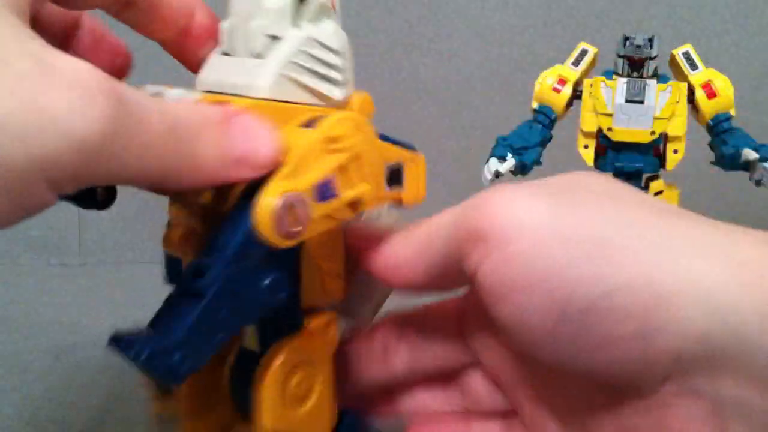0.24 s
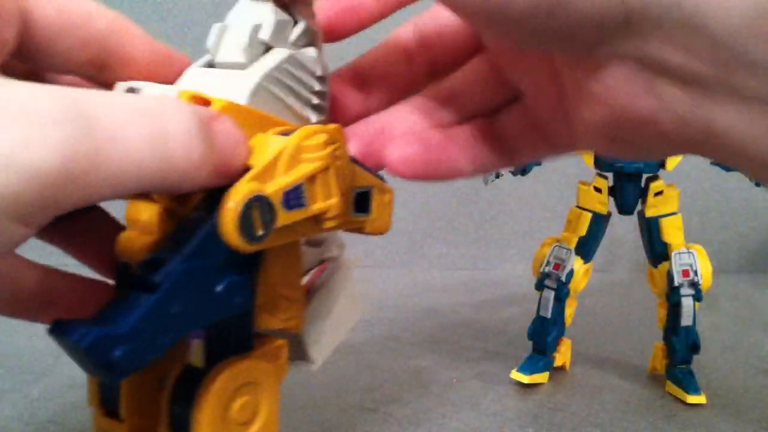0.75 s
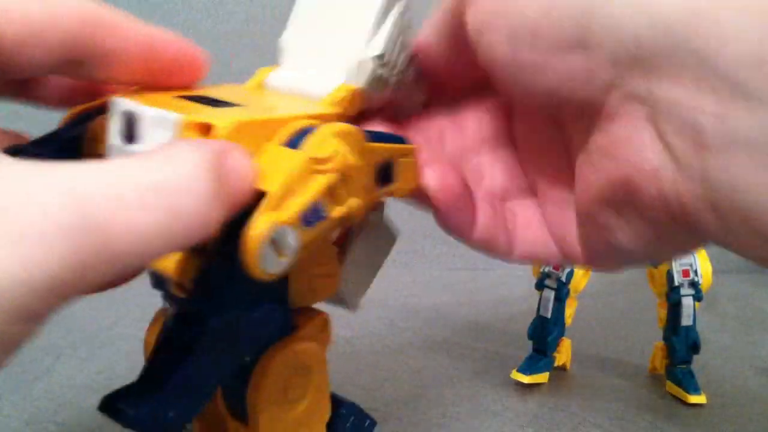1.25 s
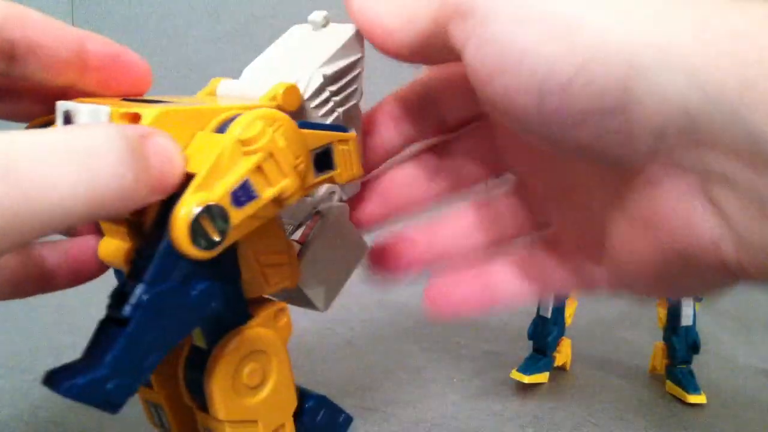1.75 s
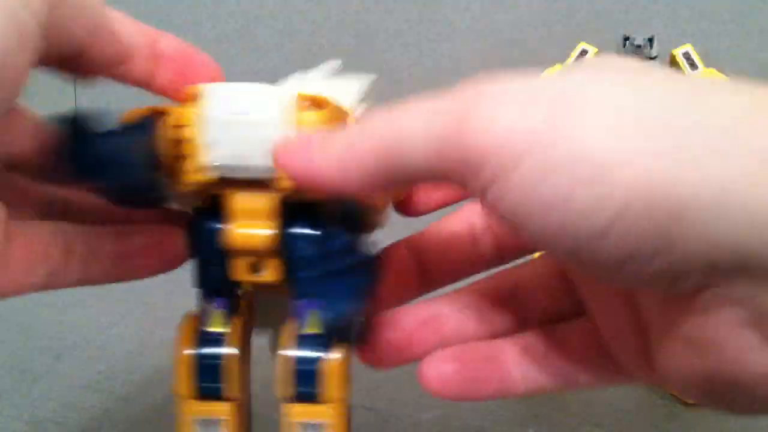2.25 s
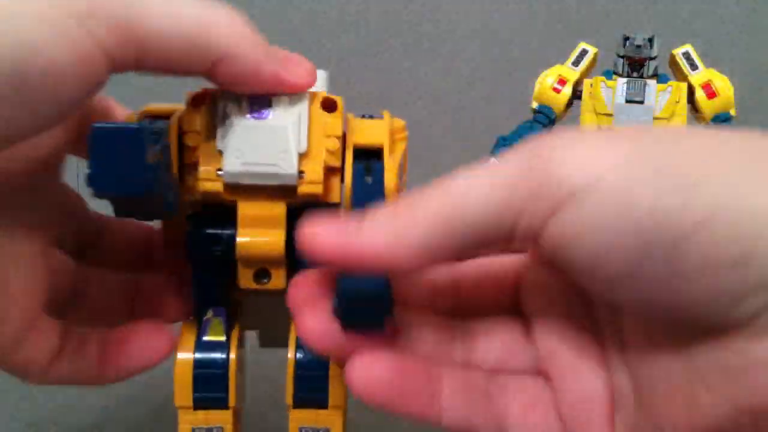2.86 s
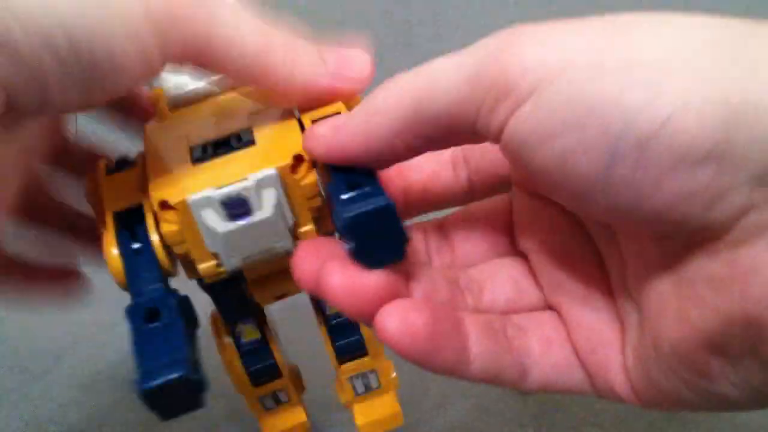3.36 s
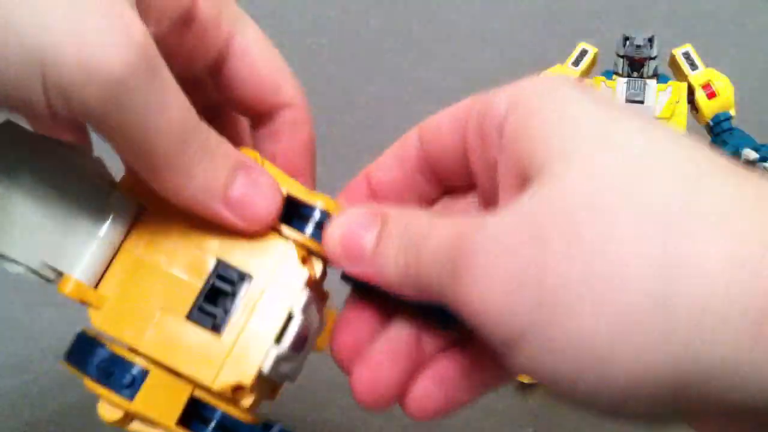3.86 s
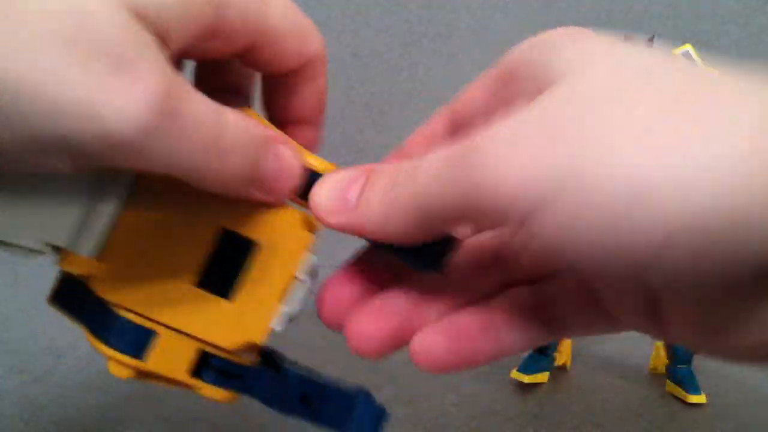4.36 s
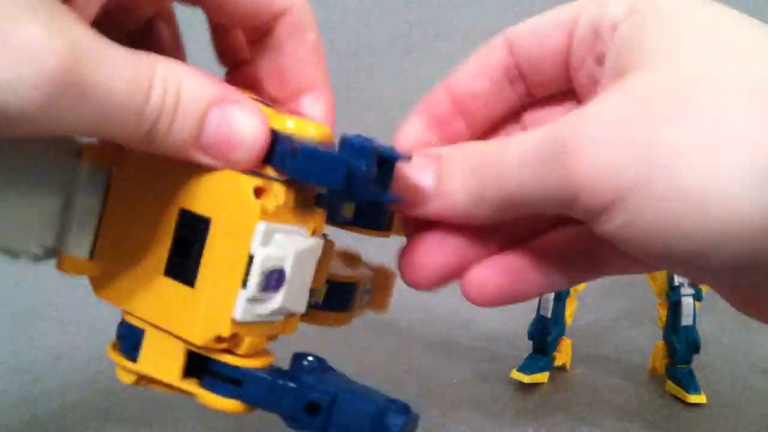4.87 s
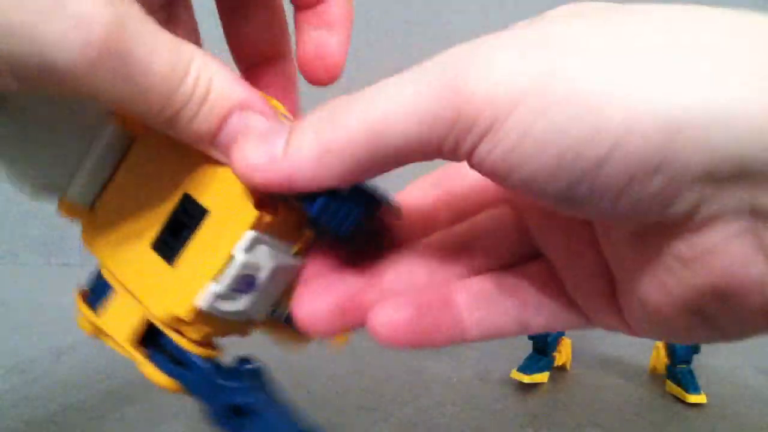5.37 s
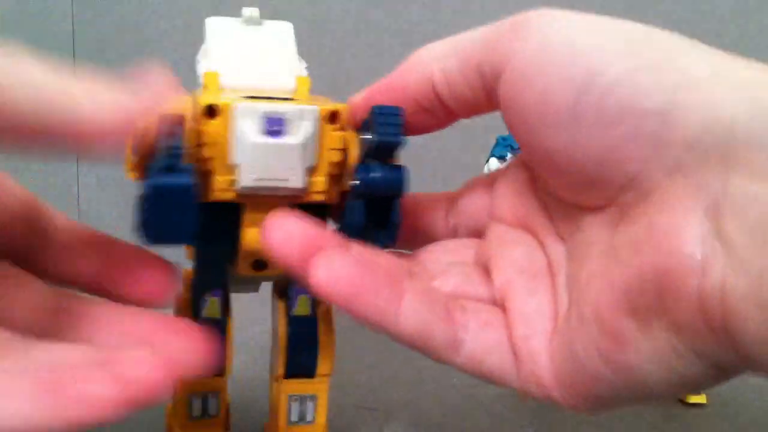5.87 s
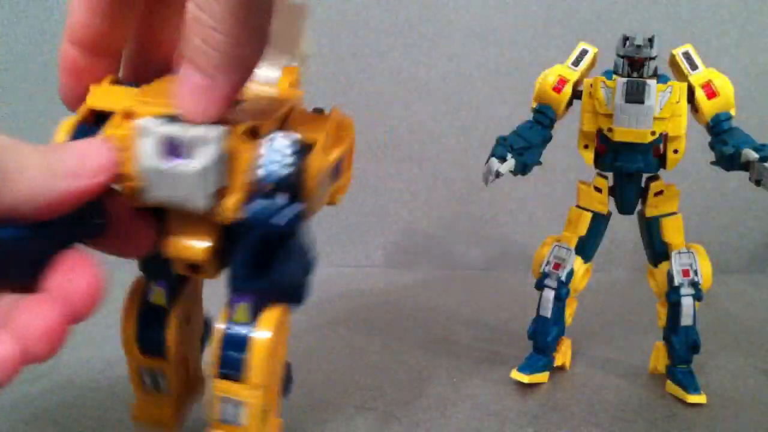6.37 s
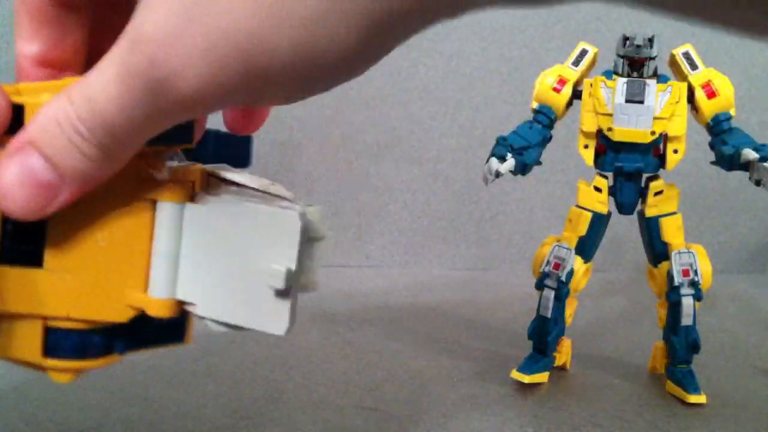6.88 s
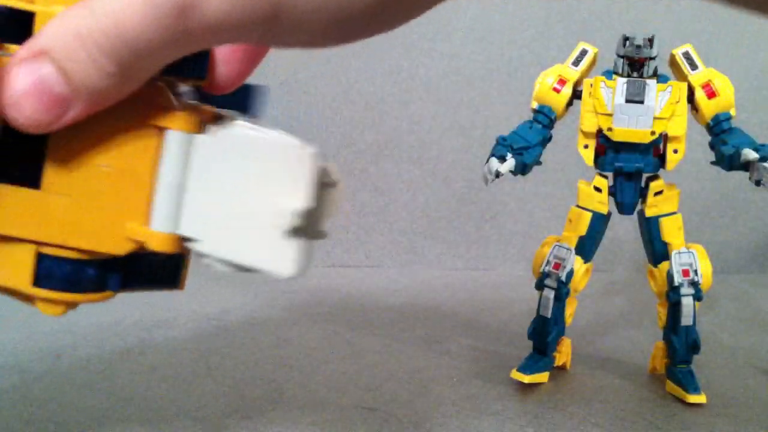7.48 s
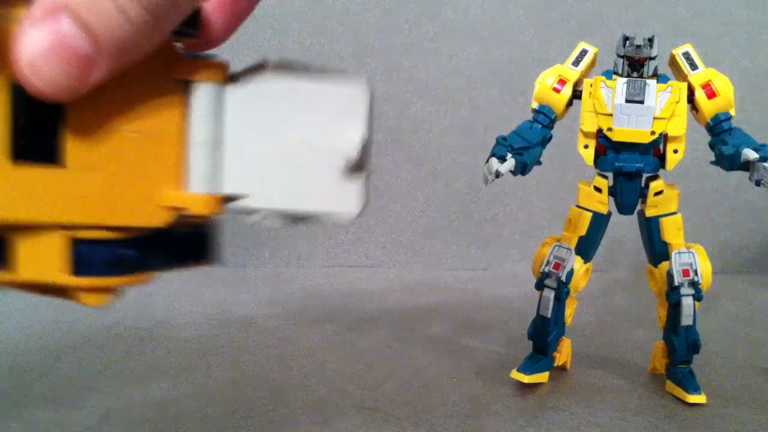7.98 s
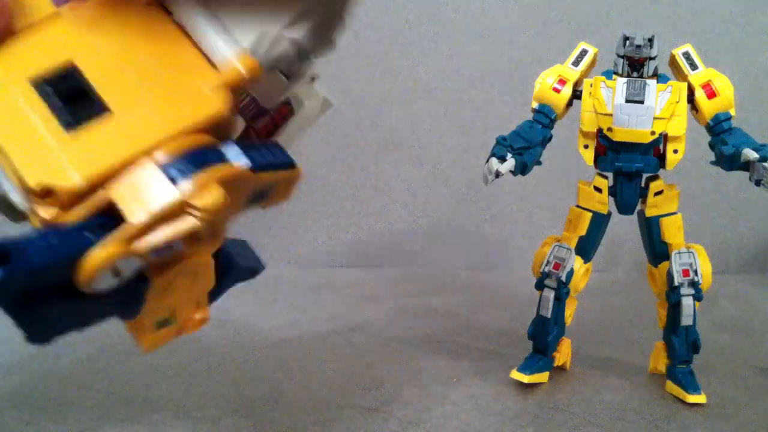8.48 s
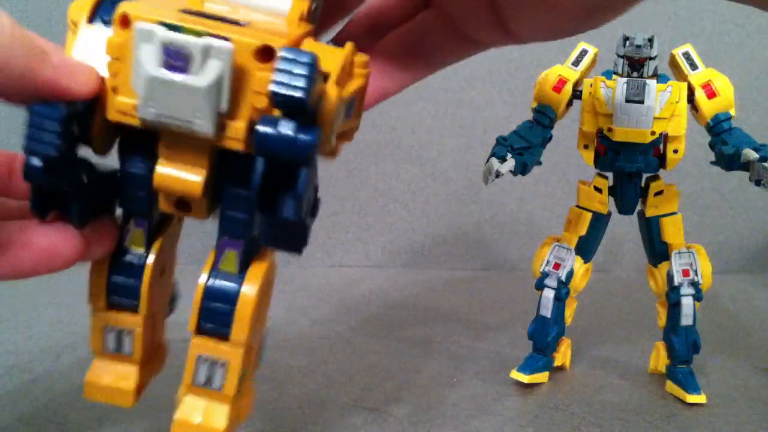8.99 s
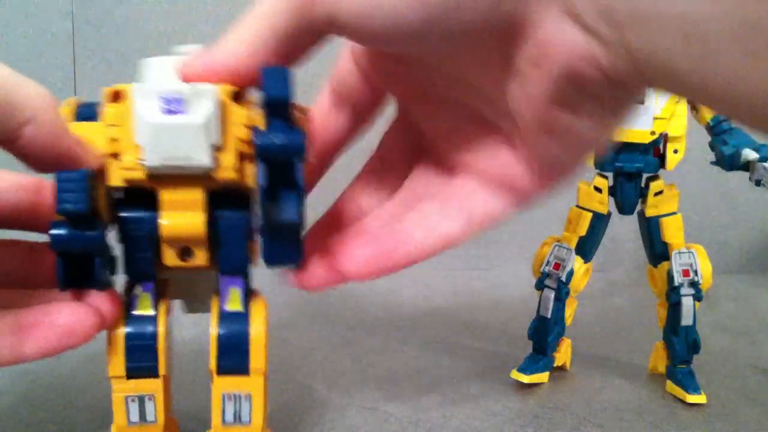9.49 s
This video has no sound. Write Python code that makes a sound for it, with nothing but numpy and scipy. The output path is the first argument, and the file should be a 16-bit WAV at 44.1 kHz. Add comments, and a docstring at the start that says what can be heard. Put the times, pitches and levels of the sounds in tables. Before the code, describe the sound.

Hollow plastic toy parts click, snap and knock irregularly as hands fold a jointed figure, with soft table bumps in a quiet room.

```python
"""A small quiet room: hands turn and fold a hollow plastic toy figure over a table.
Joints snap and parts knock: brief contacts ring the short modes of the plastic, and echoes answer.
Limbs bump the table top and set its low modes ringing; grains of friction make the rub, drag and lean.
Joints squeak faintly as noise through a narrow resonance; steady coloured noise is room hum and microphone hiss."""
import sys
import numpy as np
from scipy import signal
from scipy.fft import rfft, irfft
from scipy.io import wavfile

SR = 44100
rng = np.random.default_rng(int(sys.argv[2]) if len(sys.argv) > 2 else 0)


def inscribe(sig):
    """Save sig as 16-bit PCM at rate SR to the path in sys.argv[1].

    A 1-D sig is mono; a 2-D sig holds one channel per row.
    Samples are clipped to [-1, 1] before scaling.
    """
    pcm = np.round(np.clip(np.atleast_2d(sig).T, -1, 1) * 32767)
    wavfile.write(sys.argv[1], SR, pcm.astype(np.int16))


N = 429534
CONTROL_STEP = 32   # samples between readings of the slow controls

# Plastic snapping or knocking on plastic. Each row: start in seconds, level in dB before the shares,
# pitch in Hz of the larger and of the smaller part, shares in dB of hollow body, panels and sharp edge.
PART_KNOCKS = [(0.1063, -36, 1440, 3470, -14, -16, -21), (0.1156, -37, 2390, 2820, -17, -13, -17.5),
               (0.1294, -41, 1380, 3570, -20, -14, -19), (0.1384, -38.5, 1170, 3570, -17, -13, -15),
               (0.154, -35.5, 1620, 3570, -20, -16, -15), (0.1974, -34, 1790, 3560, -24, -22, -15),
               (0.2114, -33.5, 1790, 5210, -16, -14, -16), (0.2214, -27.5, 1680, 3170, -15, -17, -19),
               (0.236, -36, 2640, 3430, -23, -17, -19), (0.2914, -32, 2560, 2730, -17, -7, -22),
               (0.3944, -50, 1100, 5850, -14, -10, -14), (0.411, -47.5, 1960, 5250, 1, 3, -7),
               (0.4499, -29, 1730, 2700, -9, -13, -22), (0.4747, -43, 1550, 2770, -6, -17, -26),
               (0.4864, -46, 1460, 4830, -10, -13, -23), (0.5513, -47.5, 1170, 5130, -20, -21, -10),
               (0.7387, -38.5, 1640, 4200, -18, -8, -13), (0.7711, -35, 2630, 2810, -14, -9, -18),
               (0.8023, -28.5, 1210, 3900, -15, -15, -19), (0.8294, -44, 1210, 6720, -12, -15, -13),
               (0.9055, -41, 1280, 3600, -11, -17, -16), (0.924, -35.5, 1310, 4430, -23, -21, -19),
               (0.9607, -39, 1420, 3500, -10, -15, -30), (1.0076, -43, 1630, 3590, -20, -15, -27),
               (1.0475, -45, 1120, 2720, -14, -12, -16), (1.1139, -42.5, 2110, 2750, -20, -13, -19.5),
               (1.1448, -41.5, 2130, 3610, -19, -16, -16), (1.2104, -25, 1310, 8480, -20, -20, -7),
               (1.358, -40, 1170, 3630, -15, -18, -11), (1.3915, -34, 1250, 4400, -17, -12, -18),
               (1.4032, -31, 1290, 3730, -15, -14, -14), (1.51, -38, 1870, 8170, -31, -18, -11.5),
               (1.62, -40.5, 2700, 2790, -20, -13, -13), (1.6286, -45, 1610, 2720, -11, -15, -15),
               (1.6712, -16, 1274, 3550, -9, -16, -19), (1.6945, -34, 1314, 2730, -10, -12, -20),
               (1.954, -44.5, 1600, 3590, -10, -15, -17.5), (1.9624, -46, 1900, 2840, -11, -15, -25),
               (2.1079, -45.5, 2590, 4920, -6, -14, -15), (2.1254, -41, 1850, 5010, -10, -16, -24),
               (2.3447, -41, 2270, 4790, -14, -12, -13), (2.3664, -45.5, 2280, 3730, -12, -9, -21),
               (2.4291, -31, 1520, 5020, -10, -15, -16), (2.4714, -42, 1190, 3500, -14, -11, -18),
               (2.4934, -45.5, 2310, 5030, -11, -12, -15), (2.5255, -39, 1310, 3580, -15, -17, -18),
               (2.606, -46.5, 1410, 5010, -15, -22, -9), (2.734, -45, 1253, 2730, -11, -13, -28),
               (2.78, -43.5, 1840, 3570, -14, -17, -17.5), (2.805, -46, 1850, 2720, -6, -7, -17),
               (2.8234, -40, 1320, 2930, -12, -14.5, -19), (2.8679, -50, 1910, 2970, -12, -12, -27),
               (2.929, -48, 1200, 5170, -10, -9, -24), (2.9397, -45, 1590, 4000, -12, -13, -19),
               (2.9592, -43.5, 1570, 4730, -16, -19, -14), (2.9764, -47, 1670, 4010, -10, -16, -17),
               (2.9856, -45.5, 1290, 4650, -13, -18, -15), (3.0315, -44, 1870, 2750, -13, -9, -14),
               (3.0695, -39, 2170, 5080, -17, -14, -15.5), (3.1106, -45, 2200, 6820, -12, -11, -18),
               (3.126, -47, 2160, 4480, -22, -11, -9), (3.1504, -39.5, 2050, 5130, -14, -8, -13),
               (3.1652, -33, 1880, 2760, -9, -9, -18), (3.1864, -44, 2030, 7770, -14, -13, -20),
               (3.2251, -47, 2020, 2770, -10, -10, -18), (3.2474, -44, 1300, 2700, -8, -10, -21),
               (3.3336, -44, 1290, 3620, -17, -15, -12), (3.4251, -50.5, 1290, 5490, -2, 2, -3.5),
               (3.4534, -29.5, 1130, 5340, -9, -14, -14.5), (3.4974, -49, 2440, 2740, -13, -11, -12),
               (3.6326, -38.5, 2580, 7120, -18, -19, -11.5), (3.686, -30, 2290, 6150, -18, -11, -14),
               (3.699, -27.5, 2130, 3570, -18, -10, -15), (3.7303, -25, 2130, 3530, -21, -13, -14),
               (3.7974, -36.5, 2410, 3550, -28, -19, -12.5), (3.9095, -43, 1530, 4330, -7, -11, -25),
               (4.0048, -45.5, 2420, 4500, -21, -18, -13.5), (4.0172, -43.5, 2170, 5370, -15, -15, -17),
               (4.035, -43, 2050, 6900, -16, -14, -12), (4.0952, -39.5, 2030, 5990, -19, -15, -15.5),
               (4.2118, -51, 1600, 2730, -13, -12, -23), (4.2945, -42, 2050, 6610, -18, -14, -15.5),
               (4.3211, -42.5, 2590, 5390, -19, -14, -16), (4.366, -47.5, 2100, 6750, -24, -20, -15.5),
               (4.4303, -53, 1730, 4930, -17, -18, -14.5), (4.5062, -47, 2620, 5790, -23, -20, -15.5),
               (4.5685, -38.5, 2500, 3690, -21, -13, -18.5), (4.799, -38.5, 2010, 5020, -25, -20, -24),
               (4.8244, -47, 2660, 7400, -20.5, -15, -14), (5.0837, -48, 1930, 7430, -27, -22, -13),
               (5.2584, -46, 1990, 3140, -18, -14, -12), (5.2704, -40.5, 2440, 3140, -21, -15, -21),
               (5.2826, -42.5, 1810, 3830, -19, -12, -21), (5.3236, -44.5, 1740, 7320, -23, -24, -12),
               (5.435, -44.5, 1800, 4260, -13, -14, -16), (5.5454, -50, 2470, 3800, -17, -14, -15),
               (5.6204, -39, 1290, 2700, -15, -13, -18), (5.655, -40.5, 1970, 3390, -22, -14, -19),
               (5.6624, -38.5, 1550, 3770, -15, -14, -18), (5.7636, -30.5, 1660, 4940, -21, -23, -13),
               (5.8975, -31, 1220, 4240, -10, -18, -15), (6.231, -50.5, 2250, 8130, -12, -9, -17),
               (6.2654, -51, 1200, 5250, -13, -7, -10), (6.3044, -48, 1170, 3810, -13, -15, -19),
               (6.3568, -41.5, 2180, 3070, -10, -8, -13.5), (6.3895, -34, 2110, 4090, -15, -7, -19),
               (6.4184, -42, 2100, 2720, -15, -8, -28), (6.4742, -35.5, 1250, 3550, -9, -7, -16),
               (6.4877, -32.5, 2060, 2700, -14, -6, -19), (6.5122, -41, 2240, 2720, -13, -11, -23),
               (6.5804, -51, 1180, 4580, -12, -14, -16), (6.6243, -48.5, 2460, 4070, -21, -18, -12),
               (6.6952, -52.5, 1260, 7380, -10, -3, -8), (6.7245, -39.5, 2460, 2700, -19, -11, -17),
               (6.8104, -49.5, 2330, 4000, -19, -18, -9), (6.8773, -40, 1420, 4140, -14, -15, -22),
               (6.8922, -46, 1380, 3140, -12, -16, -21), (6.9629, -16.5, 2305, 3150, -22, -13, -18.5),
               (7.0042, -38, 2150, 3150, -21, -13, -11.5), (7.0454, -47, 2330, 3100, -21, -20, -19),
               (7.123, -46, 2160, 4940, -12, -8, -29), (7.226, -45, 2020, 3600, -18, -16, -13.5),
               (7.3149, -29.5, 1540, 3010, -17, -19, -16), (7.3278, -33, 1460, 4330, -16, -15, -16),
               (7.3446, -39, 1960, 2940, -13, -11, -16), (7.3517, -38, 1990, 6940, -15, -12, -11),
               (7.4051, -36, 2580, 4470, -18, -15, -13), (7.441, -43.5, 2180, 3970, -16, -12, -18),
               (7.6976, -40.5, 1436, 3840, -14, -16, -29), (7.8805, -33, 2300, 2990, -16, -8, -18.5),
               (8.0661, -51, 1950, 3970, -14, -11, -19), (8.108, -46, 1260, 3750, -18, -16, -20),
               (8.1308, -40, 1950, 5630, -21, -15, -18), (8.2574, -28.5, 1420, 3130, -14, -16, -12),
               (8.5071, -34, 2220, 2700, -17, -6, -28), (8.5234, -48, 1265, 3180, -11, -12, -17),
               (8.6033, -34, 2180, 2830, -27, -17, -17.5), (8.7228, -43, 1260, 4500, -14, -16, -12),
               (8.754, -40, 1960, 3600, -17, -16, -10), (8.8166, -41, 2290, 7110, -16, -18, -14),
               (8.8416, -44, 1420, 2750, -8, -15, -29), (8.8865, -42, 2380, 2790, -16, -11, -15),
               (8.9386, -46, 1440, 3080, -13, -15, -17), (9.0103, -38, 2700, 4170, -8.5, -10, -10),
               (9.0168, -34, 1630, 2950, -9, -14, -27), (9.0518, -36.5, 2310, 4650, -14, -13, -20),
               (9.1062, -48, 1640, 2920, -10, -12, -24.5), (9.2607, -54, 1790, 2930, -13, -12, -19),
               (9.333, -22, 1240, 4130, -12, -18, -17.5), (9.3718, -44, 1770, 4810, -12, -18, -14),
               (9.4115, -46.5, 1760, 5450, -14, -19, -11), (9.469, -47, 1890, 2840, -13, -8, -26),
               (9.621, -54, 2410, 3180, -11, -11, -4.5), (9.6598, -38.5, 1280, 5290, -21, -20, -12.5),
               (9.723, -44.5, 1340, 4220, -19, -18, -20), (1.1992, -9, 1300, 5400, -24, -26, -24),
               (1.1983, -5, 2900, 9100, -34, -32, -15), (1.2003, -14, 2900, 5400, -22, -18, -24),
               (1.6735, -23, 2840, 3600, -19, -16, -20), (1.6752, -23, 1300, 7200, -14, -20, -14),
               (6.9652, -22, 2250, 7400, -26, -12, -18), (9.336, -28, 2800, 4250, -23, -20, -22)]
# Toy bumping the table. Each row: start in seconds, level in dB of the main modes,
# then shares in dB of the lowest, the upper and the top modes, relative to that level.
TABLE_BUMPS = [(0.217, -51.5, -24, -6, -16), (0.293, -35, -16, -19, -30), (0.339, -44, -11, -13, -31),
               (0.451, -33.5, -19, -9, -14), (0.785, -43, -24, -10, -20), (0.91, -46, -23, -9, -19),
               (0.933, -46.5, -27, -5, -17), (1.006, -47.5, -29, -4.5, -25), (1.204, -34, -19, -14, -15),
               (1.358, -31, -15, -14.5, -26), (1.401, -37, -15, -10.5, -24), (1.628, -51.5, -16, -17, -12),
               (1.676, -39.5, -19, -10, -15), (1.844, -54, -19, -11.5, -23), (1.955, -53, -18, -13, -22),
               (2.121, -50, -23, -12, -13), (2.211, -54.5, -24, -2, -14), (2.337, -53, -2, -15, -15),
               (2.407, -45, -13, -11, -18), (2.523, -43, -12, -11, -22), (2.578, -48, -12, -10, -23),
               (2.88, -52, -20, -16, -21), (2.942, -46.5, -18, -14, -24), (3.07, -45, -16, -7, -20),
               (3.188, -49, -20, -9, -15), (3.245, -43, -25, -14, -20), (3.299, -48, -21, -13.5, -25),
               (3.438, -48, -18, -8, -7), (3.462, -45, -22, -7, -9), (3.509, -47.5, -18, -15, -21),
               (3.667, -46.5, -19, -7.5, -17), (3.916, -46.5, -21, -5, -17), (4.297, -54.5, -19, -7, -15),
               (5.759, -49, -31, -5.5, -6), (5.901, -29, -19, -8.5, -20), (6.068, -51.5, -25, -4.5, -22),
               (6.138, -52.5, -10, -9.5, -19), (6.358, -46, -11, -11, -17), (6.482, -49, -10, -8, -10),
               (6.562, -49.5, -15, -12, -20), (7.306, -54.5, -16, -11, -18), (8.717, -55.5, -21, -3.5, -11),
               (5.944, -43, -18, 2, -22), (9.334, -26, -13, -9, -22), (9.385, -45, -13, -1, -23)]
# Modes of the toy's parts. Each row: frequency in Hz, strength in dB, t60 in seconds.
PLASTIC_MODES = [(1050, -5, 0.03), (1300, 5, 0.016), (1590, 3, 0.017), (1800, -2, 0.035), (1994, -2, 0.033),
                 (2250, 4, 0.015), (2590, -5, 0.042), (2878, -2.5, 0.035), (3190, -0.5, 0.016),
                 (3600, 1.5, 0.014), (4000, -1.5, 0.02), (4400, -2, 0.022), (4900, 1, 0.014),
                 (5400, 2.5, 0.0094), (5910, -1, 0.016), (6724, 9, 0.004), (6900, -1.5, 0.002),
                 (7300, 0.5, 0.0066), (8000, 4, 0.007), (8756, -2, 0.0095), (9650, -4.5, 0.0066),
                 (9475, -14, 0.0067), (10410, -5.5, .004), (11600, -25.5, 0.011), (13000, -17.5, .004),
                 (14600, -43, .004)]
# Lowest, main and upper modes of the table top. Each row: frequency in Hz, strength in dB, t60 in seconds.
TABLE_LOWEST = [(120.5, 2, 0.22), (155, -9, .14)]
TABLE_BODY = [(181, -11, 0.16), (194.8, -0.5, 0.17), (227.7, -7.5, 0.14)]
TABLE_UPPER = [(253, -4.5, 0.072), (289, -5.5, 0.18), (314.3, 0.5, 0.21), (348.6, 0.5, 0.14),
               (402, -4.5, 0.14), (440, -6.5, 0.11)]


def clicks():
    """Joints snap and parts knock, their own pitches loudest; gives direct sound and a mix for the room."""
    # Centres in Hz of four colours: hollow body, panels, middle, sharp edge.
    colour_hz = [1250, 2300, 4500, 8200]
    body_db, panel_db, edge_db = -1.5, -3, 1.5   # how readily each answers, on top of its share
    middle_db = -16   # share of the modes between panels and edge
    part_db, part_octaves = 3, .35   # broad lift around the pitch of either part
    peak_db, peak_octaves = 7, .069   # narrow lift right at the pitch
    rows = np.r_[np.array(PART_KNOCKS), ticks()]
    start_s, level_db, pitch_hz = rows[:, 0], rows[:, 1:2], rows[:, 2:4]
    middle = np.full(len(rows), middle_db)
    shares = np.c_[rows[:, 4] + body_db, rows[:, 5] + panel_db, middle, rows[:, 6] + edge_db]

    octave = np.log2(np.array(PLASTIC_MODES)[:, 0])
    colour_db = np.array([np.interp(octave, np.log2(colour_hz), row) for row in shares])
    away = np.min(abs(octave - np.log2(pitch_hz[:, :, None])), axis=1)   # octaves to the nearer part
    broad_db = part_db * np.exp(-(away / part_octaves) ** 2)
    narrow_db = peak_db * np.exp(-(away / peak_octaves) ** 2)
    mode_db = level_db + colour_db + broad_db + narrow_db

    direct = strike(start_s, mode_db - 4.0, PLASTIC_MODES, spread_db=1.0, chatter_s=.0016, count=3)
    # the mix sent out in all directions is evener and rings shorter
    damped = [(hz, db, .55 * t60) for hz, db, t60 in PLASTIC_MODES]
    all_round = strike(start_s, mode_db - .1, damped, spread_db=0.3, chatter_s=.0008, count=1)
    low_cut = signal.butter(3, 915, "high", fs=SR, output="sos")   # the knocks carry little below about 900 Hz
    return signal.sosfilt(low_cut, [direct, all_round])


def ticks():
    """Small loose parts tick at random, following the level of the rub; rows as in PART_KNOCKS."""
    per_s, above_rub_db, spread_db = 20, 12.5, 2.5
    chance = rng.random((int(per_s * N / SR), 3))
    scatter = rng.standard_normal((len(chance), 4))
    at = (chance[:, 0] * N).astype(int)
    rub_db, _ = strokes()
    level_db = rub_db[at // CONTROL_STEP] + above_rub_db + spread_db * scatter[:, 0]
    pitch_hz = [1200, 2800] * 2 ** ([1.1, 1.5] * chance[:, 1:])
    shares_db = np.add([-13, -12, -24], 5 * scatter[:, 1:])
    return np.c_[at / SR, level_db, pitch_hz, shares_db]


def bumps():
    """Soft blows ring the table top; low-passes slow its answer, most of all for the heavy low modes."""
    # Top modes of the table top. Each row: frequency in Hz, strength in dB, t60 in seconds.
    table_top = [(506, -6, 0.12), (603, -8, 0.035), (672.5, -1, .06), (796, -4, 0.036)]
    s, main_db, low_db, high_db, top_db = np.array(TABLE_BUMPS).T[:, :, None]
    start_s = s[:, 0]
    low = strike(start_s, main_db + low_db, TABLE_LOWEST, spread_db=0.3, chatter_s=0.019, count=1)
    main = strike(start_s, main_db, TABLE_BODY, spread_db=1.6, chatter_s=0.007, count=1)
    high = strike(start_s, main_db + high_db - 3, TABLE_UPPER, spread_db=1.0, chatter_s=.012, count=1)
    top = strike(start_s, main_db + top_db + 3, table_top, spread_db=1.0, chatter_s=.005, count=1)
    heavy = signal.butter(2, 260, fs=SR, output="sos")
    soft = signal.butter(2, 1000, fs=SR, output="sos")
    return signal.sosfilt(heavy, low + main) + signal.sosfilt(soft, high + top)


def handling():
    """Parts rub on each other and the fingers in uneven slips; feet drag on the table, hands lean on it."""
    bright_db, rub_db, drag_db, lean_db = busy()
    uneven_rub_db = rub_db + 3.0 * slips(120) + 2.5 * slips(25)
    rub = scrape(PLASTIC_MODES, uneven_rub_db, bright_db, per_s=13000, size_db=3.5)
    drag = scrape(TABLE_BODY + TABLE_UPPER, drag_db + 3.4 * slips(5), tilt_db=2.5, per_s=500, size_db=3.5)
    lean = scrape(TABLE_LOWEST, lean_db + 2.5 * slips(5), tilt_db=3, per_s=180, size_db=1.5)
    return rub + drag + lean


def busy():
    """Brightness, rub, drag and lean in dB: the hands' own work plus what trails each click and bump."""
    # Weight of hands and toy on the table, read between the rows.
    # Each row: time in seconds, drag in dB, lean on the lowest modes in dB.
    weight = [(0, -69, -88), (.25, -70, -87), (.42, -57, -56), (.6, -69, -83), (.9, -61, -78),
              (1.4, -67, -68), (1.9, -73.5, -87), (2.3, -68, -78), (2.42, -59, -51), (2.6, -64.5, -71),
              (3.3, -65, -73), (3.9, -72, -89.5), (4.3, -80, -91), (4.66, -71.5, -96), (4.9, -88.5, -94.5),
              (5.8, -86, -88), (6.199, -68, -83), (6.45, -63.5, -61), (6.7, -80.5, -89), (8.6, -85.5, -90),
              (8.85, -66, -95), (9.2, -71.5, -94.5), (9.6, -60.5, -75.5), (9.74, -66, -72)]
    lean_share_db = -5.5   # share of the settling in the lowest modes
    s, *columns = np.transpose(weight)
    drag, lean = [from_db(2 * np.interp(control_times(), s, c)) for c in columns]
    stroke_db, bright_db = strokes()
    slide = after(np.array(PART_KNOCKS), share_db=-32.5, t60=.2)   # parts slide on after each click
    settle = after(np.array(TABLE_BUMPS), share_db=-20.5, t60=0.28)   # the toy settles after each bump
    rub = from_db(2 * stroke_db) + slide
    levels = 10 * np.log10([rub, drag + settle, lean + from_db(2 * lean_share_db) * settle])
    return [np.interp(np.arange(N) / SR, control_times(), c) for c in (bright_db, *levels)]


def strokes():
    """Level in dB and brightness of the rub at the control rate: each stroke swells and fades as a bell."""
    # A part is pushed, turned or slid. Each row: strongest moment in seconds, length in seconds,
    # rub of the plastic parts in dB, brightness of the rub in dB per octave.
    moves = [(0.133, 0.041, -58, -3.5), (0.225, 0.043, -55, 0.5), (.46, .13, -57, -1),
             (0.81, 0.091, -60, -1.5), (.95, 0.15, -66.5, -2), (1.542, 0.042, -65, 2), (2.4, 0.31, -65, -2),
             (2.983, 0.21, -66, -1), (3.237, 0.15, -60, -2.5), (3.472, 0.073, -63, -2),
             (3.748, .08, -68, -1), (4.095, 0.11, -70.5, -2), (4.306, 0.057, -70, -3),
             (4.666, 0.057, -69.5, 0.5), (5.65, 0.065, -71, -6), (6.436, 0.27, -64, -2.5),
             (6.85, 0.11, -69.5, 1), (8.53, 0.055, -65.5, -1), (8.84, .2, -73.5, -1),
             (9.044, 0.11, -67, -0.5), (9.419, 0.18, -67.5, -4), (9.671, .1, -68, 0)]
    rest_db = -86.5   # rub between strokes
    s, length, level_db, bright_db = np.array(moves).T[:, :, None]
    power = from_db(2 * level_db) * np.exp(-(2 * (control_times() - s) / length) ** 2)
    total = power.sum(axis=0) + from_db(2 * rest_db)
    brightness = (power * bright_db).sum(axis=0) / total
    return 10 * np.log10(total), brightness


def after(rows, share_db, t60):
    """Power that starts with each event and dies away, at the control rate."""
    kick = np.zeros(len(control_times()))
    at = (rows[:, 0] * SR / CONTROL_STEP).astype(int)
    np.add.at(kick, at, from_db(2 * (rows[:, 1] + share_db)))
    decay = from_db(-2 * 60 * CONTROL_STEP / (t60 * SR))
    return signal.lfilter([1], [1, -decay], kick)


def control_times():
    """Moments in seconds at which the slow controls are read."""
    return np.arange(0, N, CONTROL_STEP) / SR


def slips(per_s):
    """Slow chance of unit rms: how hard a rubbing contact grips from moment to moment."""
    r = np.exp(-2 * np.pi * per_s / SR)
    return rms_one(signal.lfilter([1], [1, -2 * r, r * r], rng.standard_normal(N)))


def squeak():
    """Quick slips of a tight joint, as noise, ring one narrow resonance; they swell, hold and fade."""
    # Faint joint squeaks. Each row: start of the hold in seconds, its length in seconds,
    # level in dB, pitch in Hz.
    squeaks = [(4.64, .04, -70, 4967), (7.6, .05, -73, 5400), (7.605, 0.016, -68, 3850)]
    edge_s, t60_s = .015, .018
    out = np.zeros(N)
    for s, length, level_db, hz in squeaks:
        corners = [s - edge_s, s, s + length, s + length + edge_s]
        swell = np.interp(np.arange(N) / SR, corners, [0, 1, 1, 0])
        tone = rms_one(ring(rng.standard_normal(N), hz, t60_s))
        out += from_db(level_db) * swell ** 2 * tone
    return out


def strike(times, level_db, modes, spread_db, chatter_s, count):
    """Each blow (level_db: blows x modes) is count contacts, the later ones weaker, uneven among the modes."""
    shape = (len(times), len(modes))
    gain = from_db(level_db + np.array(modes)[:, 1] + spread_db * rng.standard_normal(shape))
    late = rng.exponential(1, shape + (count,))   # in units of chatter_s
    late[..., 0] = rng.random(shape) / 2   # first contact
    contact = rng.choice([-1, 1], late.shape) * np.exp(-late / 2)
    contact[..., 1:] *= .5
    out = np.zeros(N)
    for k, (hz, _, t60) in enumerate(modes):
        force = np.zeros(N)
        at = ((times[:, None] + chatter_s * late[:, k]) * SR).astype(int)
        np.add.at(force, np.clip(at, 0, N - 1), gain[:, k, None] * contact[:, k])
        out += ring(force, hz, t60)
    return out


def scrape(modes, level_db, tilt_db, per_s, size_db):
    """Uneven grains of friction, dealt among the modes; level and tilt (dB per octave) may run in time."""
    sizes = from_db(size_db * np.minimum(rng.exponential(1, N), 4)) * rng.choice([-1, 1], N)
    grains = sizes * (rng.random(N) < per_s / SR)
    dealt = rng.integers(0, len(modes), N)
    pivot_hz = modes[len(modes) // 3][0]   # the tilt turns about this mode
    plain, tilted = np.zeros(N), np.zeros(N)
    for k, (hz, db, t60) in enumerate(modes):
        ringing = from_db(db) * ring(grains * (dealt == k), hz, t60)
        plain += ringing
        tilted += ringing * from_db(tilt_db * np.log2(hz / pivot_hz))
    return from_db(level_db) * tilted / np.std(plain)


def ring(force, hz, t60):
    """A damped two-pole resonance: a unit click sets a sine of height 1 ringing."""
    r, w = from_db(-60 / (t60 * SR)), 2 * np.pi * hz / SR
    return signal.lfilter([0, np.sin(w)], [1, -2 * r * np.cos(w), r * r], force + 1e-18)


def from_db(db):
    """Decibels to gain; twice the decibels give power."""
    return np.exp(np.asarray(db) * (np.log(10) / 20))


def rms_one(x):
    """Scale to unit rms."""
    return x / np.sqrt(np.mean(x ** 2) + 1e-20)


def room(x):
    """Dense echoes as dying noise: a quick slope from near surfaces, a slow one from the walls."""
    # Echoes from table and backdrop, then from the walls. Each row: t60 in seconds, strength in dB.
    echoes = [(0.069, -7), (.3, -13.5)]
    t = np.arange(int(.6 * SR)) / SR
    shape = np.zeros(len(t))
    for t60, db in echoes:
        slope = from_db(-60 * t / t60)
        shape += from_db(db) * slope / np.sqrt(np.sum(slope ** 2))
    tail = rng.standard_normal(len(t)) * shape * (t > .003)   # no echo in the first 3 ms
    tail = signal.sosfilt(signal.butter(1, 14000, fs=SR, output="sos"), tail)   # surfaces dull the top
    return signal.fftconvolve(x, tail)[:N]


def floor():
    """Room hum and microphone hiss: steady noise, coloured in its spectrum."""
    # Colour of the noise. Each row: frequency in Hz, relative density in dB per Hz.
    noise_colour = [(12, -21.5), (20, 0), (31, -20.5), (53, -23), (113, -7), (241, 4.5), (357, 1.5),
                    (574, -7), (780, -7.5), (1860, -11.5), (3340, -13.5), (5230, -15.5), (7950, -22),
                    (13500, -30), (16000, -46)]
    level_db = -67.5
    colour_hz, colour_db = np.array(noise_colour).T
    hz = np.maximum(np.arange(N // 2 + 1) * SR / N, 1)
    colour = from_db(np.interp(np.log(hz), np.log(colour_hz), colour_db))
    noise = irfft(rfft(rng.standard_normal(N)) * colour, N)
    return from_db(level_db) * rms_one(noise)


def scene():
    """Toy and table in the room, over the floor; the small things radiate little deep bass."""
    direct, all_round = clicks()
    played = direct + room(all_round) + bumps() + handling() + squeak()
    thin = signal.sosfilt(signal.butter(4, 101, "high", fs=SR, output="sos"), played)
    return (thin + floor())[None]


def record(dry):
    """A steep low-pass cuts the top, 60 dB down from 16.5 kHz up."""
    return signal.sosfilt(signal.cheby2(12, 60, 16500, fs=SR, output="sos"), dry)


dry = scene()
out = record(dry)
inscribe(out)
```